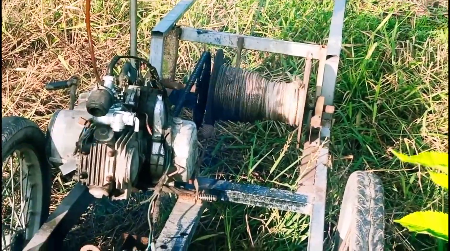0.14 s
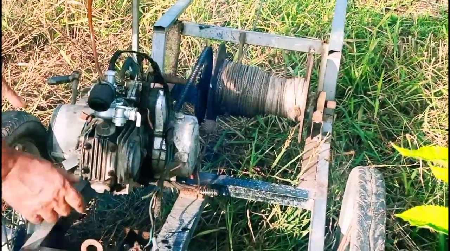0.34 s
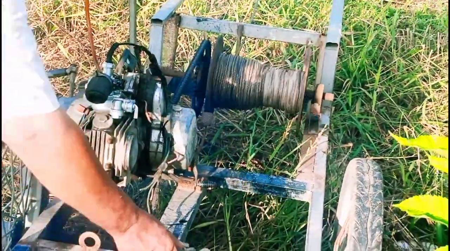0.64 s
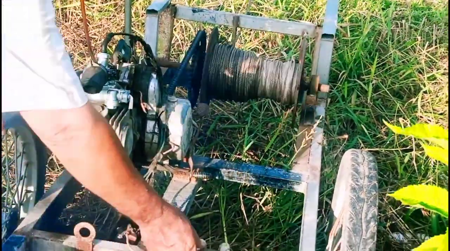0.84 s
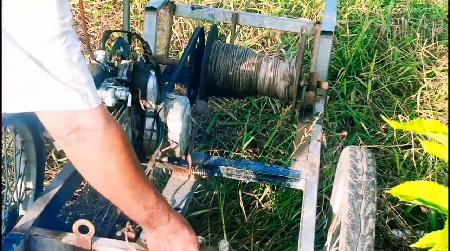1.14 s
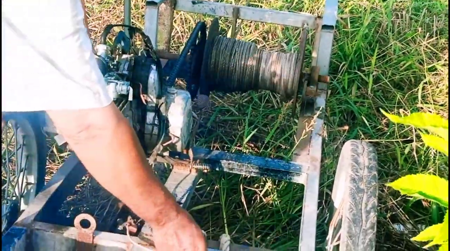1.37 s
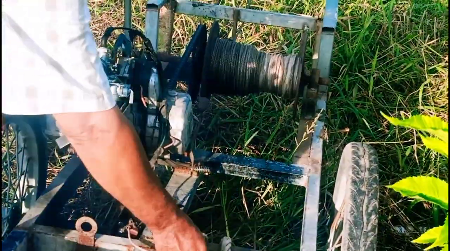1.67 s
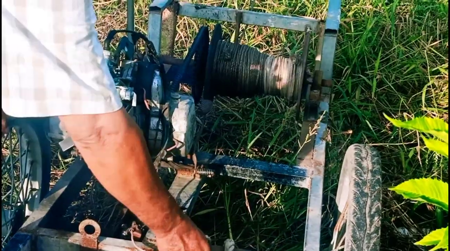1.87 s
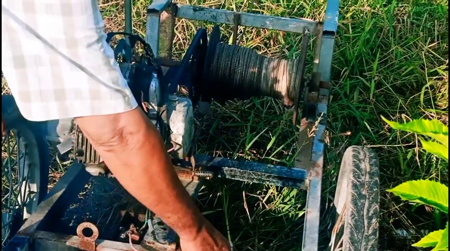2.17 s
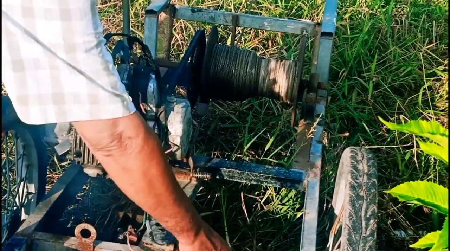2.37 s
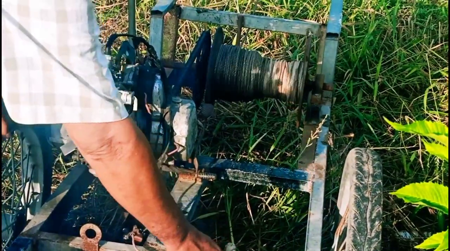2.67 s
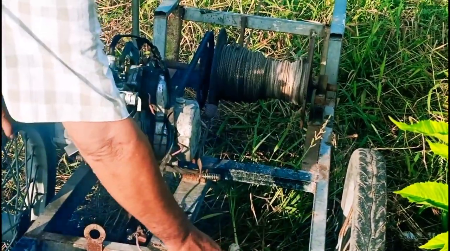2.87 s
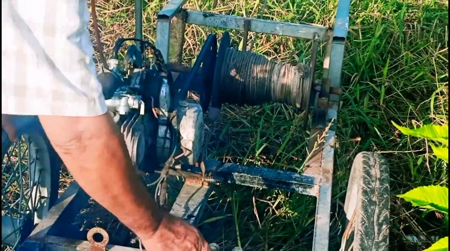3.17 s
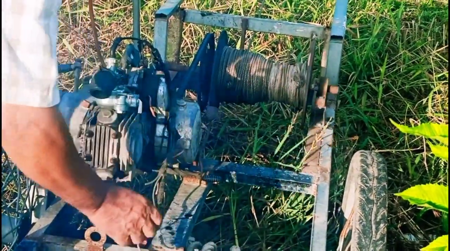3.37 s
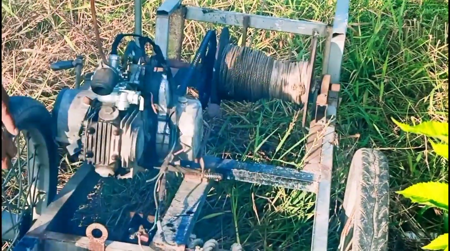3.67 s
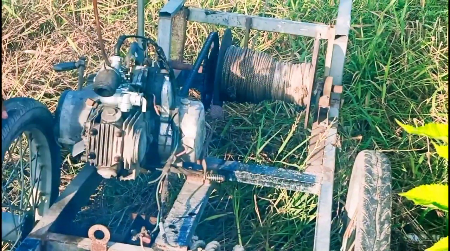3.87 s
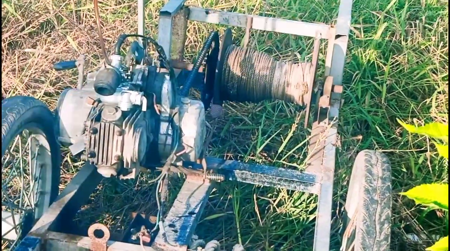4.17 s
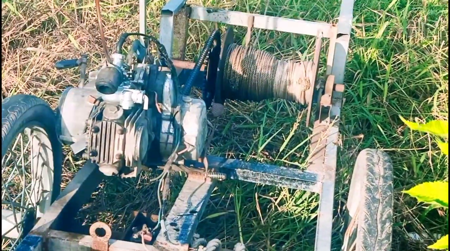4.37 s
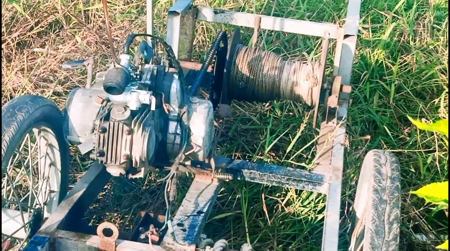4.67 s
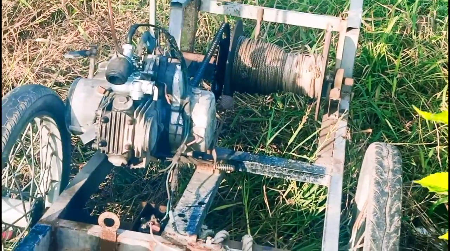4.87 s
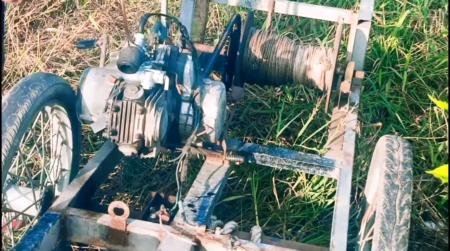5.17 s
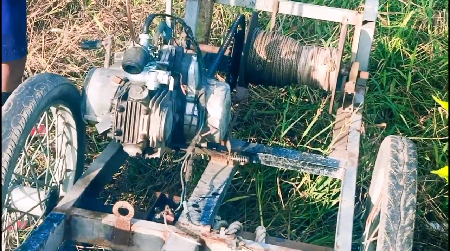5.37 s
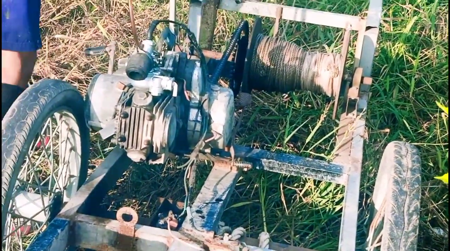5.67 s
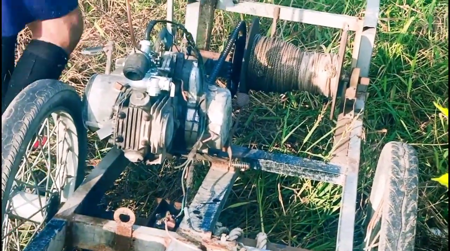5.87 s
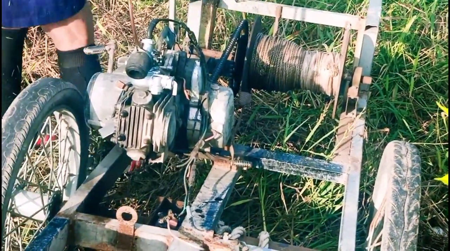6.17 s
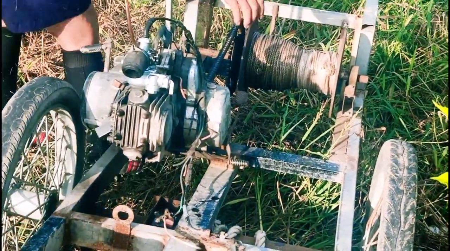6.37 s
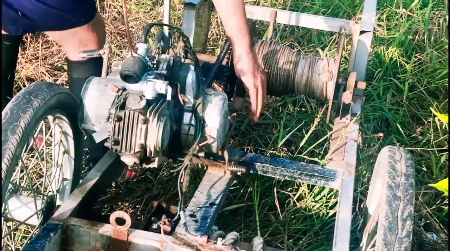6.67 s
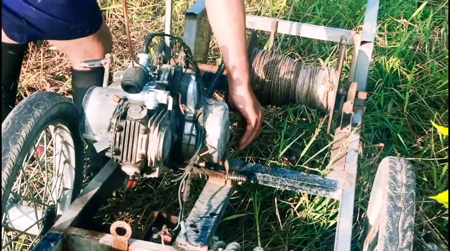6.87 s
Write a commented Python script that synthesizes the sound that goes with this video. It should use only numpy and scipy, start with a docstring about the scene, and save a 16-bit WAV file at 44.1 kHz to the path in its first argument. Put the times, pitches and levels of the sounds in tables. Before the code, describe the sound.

A small single-cylinder engine hoots in a fast even flutter, stumbles down to idle, then alternates soft hoots and sharp chuffs over metallic clatter.

```python
"""Short rising hoots in quick succession: a single-cylinder four-stroke engine on a home-made winch, in a field.
It runs fast for two seconds, stumbles down to idle, where hoot and sharp chuff alternate, and slowly gains strength.
Each hoot is a gliding sine; pulses ring the silencer, and shaped noise and short pings make hiss, whistle and knock.
Chain, gears and tappets clatter throughout as random knocks and noise ticks that ring the casing.
A short faint tail of noise follows the exhaust."""
import sys
import numpy as np
from scipy import signal
from scipy.fft import rfft, irfft
from scipy.io import wavfile

SR = 44100
rng = np.random.default_rng(int(sys.argv[2]) if len(sys.argv) > 2 else 0)


def waveform_to_disk(signal):
    """Save audio, clipped to [-1, 1], as 16-bit WAV at the path in sys.argv[1]."""
    frames = np.transpose(np.atleast_2d(signal))
    scaled = np.clip(frames, -1, 1) * 32767
    samples = np.round(scaled).astype(np.int16)
    wavfile.write(sys.argv[1], SR, samples)


N = 310023  # length in samples
LEAD = 1323  # samples before the zero of a stroke
T = np.arange(-LEAD, 2 * LEAD) / SR  # time around one stroke in seconds
VALVE_LEAD = .398  # the valve opens this share of a stroke before the peak of the hoot
FULL_DB = -13  # chuff strength at full idle, the reference for thump and hiss (dB)

# Engine speed. Each row: time in seconds, exhaust strokes per second.
SPEED = [(0.0, 28.132), (0.32, 28.113), (0.57, 27.368), (0.95, 26.547), (1.52, 26.486), (1.88, 26.676),
         (2.04, 25.348), (2.32, 19.878), (2.63, 16.328), (3.11, 14.07), (3.44, 13.112), (3.81, 12.59),
         (4.43, 12.356), (5.37, 12.393), (6.19, 12.309), (7.03, 12.348)]
# Strength of the strokes at idle, before each layer's trim. Each row: time in seconds, chuff in dB, hoot in dB.
IDLE_STRENGTH = [(2.0, -20.5, -9), (2.7, -24.5, -13.5), (3.2, -23.5, -15.5), (3.7, -21, -15),
                 (4.5, -18.5, -14), (5.2, -14.5, -9.5), (5.7, -13.5, -9), (6.0, -14, -11.5),
                 (7.0, -13.5, -8.5)]
# Clatter of the running gear, before each layer's trim. Each row: time in seconds, level in dB.
GEAR = [(0.0, -34), (0.53, -35), (1.0, -41), (1.9, -41.5), (2.74, -50), (3.44, -48.5), (3.87, -45.5),
        (4.9, -42), (5.3, -39), (7.03, -38)]
# Ringing of casing and cooling fins. Each row: centre in Hz, width in Hz, lift (or dip) in dB.
FINS = [(1010, 75, -2), (1467, 42, 9.5), (1736, 100, 5.5), (1767, 110, 4), (2366, 52, 11.5), (2590, 260, 6),
        (2760, 110, 5.5), (3900, 100, 5), (5940, 300, 6), (15300, 500, -12)]
# Side of the clatter. Each row: frequency in Hz, left minus right in dB.
GEAR_SIDE = [(200, -1), (600, -4.5), (950, 1), (1750, -6.5), (2700, 1), (4200, -4), (6400, -5), (9500, 3.5)]


def amp(db):
    """Decibels to gain."""
    return 10 ** (np.asarray(db) / 20)


def evened(x):
    """Scales to rms 1."""
    return x / np.sqrt(np.mean(x ** 2) + 1e-20)


def at(table, s, axis=1):
    """One column of a curve at time s."""
    rows = np.array(table)
    return np.interp(s, rows[:, 0], rows[:, axis])


def spectrum(points, hz):
    """Joins points on a log-frequency axis."""
    f, value = np.transpose(points)
    return np.interp(np.log(hz + 1), np.log(f + 1), value)


def add(mix, s, sound):
    """Mixes in a sound laid out on T, with its zero at time s."""
    start = round(s * SR) - LEAD
    part = mix[max(start, 0):max(start + len(sound), 0)]
    part += sound[max(-start, 0):][:len(part)]


def bell(x, width):
    """A smooth hump of height 1."""
    return np.exp(-.5 * (x / width) ** 2)


def push(width):
    """A rounded pressure pulse of area 1."""
    return bell(T, width) / bell(T, width).sum()


def ping(hz, rise, fall):
    """A tone that swells and dies within milliseconds."""
    envelope = bell(np.minimum(T, 0), rise) * np.exp(-np.maximum(T, 0) / fall)
    return envelope * np.cos(2 * np.pi * hz * T)


def hiss(rise, fall, linger_db, linger):
    """Envelope of the jet: strongest as the valve cracks open, then lingering through the stroke."""
    after = np.maximum(T, 0)
    decay = np.exp(-after / fall) + amp(linger_db) * np.exp(-after / linger)
    return bell(np.minimum(T, 0), rise) * decay


def wander(rate):
    """Smooth random drift of rms 1, its spectrum fading over 'rate' Hz."""
    fade = bell(np.fft.rfftfreq(N, 1 / SR), rate)
    return evened(irfft(rfft(rng.standard_normal(N)) * fade, N))


def ring(points, modes=(), size=8192):
    """Causal impulse response with the given colour and resonances, peak 1."""
    hz = abs(np.fft.fftfreq(size, 1 / SR))
    resonances = sum(lift / (1 + (2 * (hz - f) / width) ** 2) for f, width, lift in modes)
    db = spectrum(points, hz) + resonances
    minimum_phase = np.exp(np.conj(signal.hilbert(np.log(amp(db)))))
    response = np.fft.ifft(minimum_phase).real[:size // 2]
    return response / abs(response).max()


def through(x, response):
    """Convolution, cut to the scene's length."""
    return signal.oaconvolve(x, response)[:N]


def ports(x, side, lag_ms, apart=0):
    """Left and right: the left hears later by lag_ms; 'apart' reaches the two with opposite sign."""
    hz = np.fft.rfftfreq(N, 1 / SR)
    tilt = amp(spectrum(side, hz) / 2)
    late = np.exp(-1j * np.pi * hz * lag_ms * 1e-3)  # half the lag on each side
    left = irfft(rfft(x + apart) * tilt * late, N)
    right = irfft(rfft(x - apart) / tilt / late, N)
    return np.array([left, right])


def stroke_time(s):
    """The exhaust stroke lasts a quarter of the four-stroke cycle."""
    return 1 / at(SPEED, s) / 4


def above_idle(s):
    """Strokes per second above idle speed."""
    return at(SPEED, s) - SPEED[-1][1]


def shortfall(s):
    """dB (zero or negative) added to the stroke at time s if it is a weak one."""
    # Strokes that fall short of their neighbours. Each row: time in seconds, change in dB.
    weak_strokes = [(0.8, -2.5), (0.95, -1.5), (1.25, -4.5), (1.67, -4.5), (2.37, -5)]
    return sum(db for when, db in weak_strokes if abs(when - s) * at(SPEED, s) < .5)


def strokes():
    """Times of fast strokes, idle hoots and chuffs: hoots at speed, chuffs while slowing, then turns, save stumbles."""
    # The engine stumbles: a chuff among the hoots, or a hoot among the chuffs. Lists times in seconds.
    stumbles = [1.67, 2.05, 2.22]
    start_turn = .756  # share of the four-stroke cycle already run at the start
    idle_from, alternate_from = 1.99, 2.34  # the throttle closes; hoot and chuff begin to alternate (s)
    t = np.arange(N) / SR
    cycles = start_turn + np.cumsum(at(SPEED, t)) / SR
    times = t[1:][np.diff(np.floor(cycles)) > 0]
    fast, settled = times < idle_from, times > alternate_from
    sharp = np.where(settled, np.cumsum(settled) % 2 == 0, ~fast)
    for s in stumbles:
        sharp[np.argmin(abs(times - s))] ^= True
    opens = times - VALVE_LEAD * stroke_time(times)
    return times[fast & ~sharp], times[~fast & ~sharp], opens[sharp]


def field(x, t60=0.076, db=-21, shared=0.79):
    """Frame, ground and plants scatter a short faint tail back, partly alike on both sides."""
    t = np.arange(SR // 2) / SR
    own, common = rng.standard_normal((2, len(t))), rng.standard_normal(len(t))
    fade = amp(-60 * t / t60) * (1 - bell(t, 0.0015))  # a soft start, then the decay
    tail = (shared * common + 0.4 * own) * fade
    return amp(db) * signal.fftconvolve(x, tail / np.linalg.norm(tail[0]), axes=1)[:, :N]


def tappet(chuffs):
    """A light tick from the valve gear, noise ringing the fins, one and a half crank turns before each chuff."""
    ticks = np.zeros(N)
    for s, chance in zip(chuffs, rng.standard_normal(len(chuffs))):
        level = amp(at(GEAR, s) - 2.5 + 2.5 * chance)
        tick = hiss(rise=.0003, fall=0.0038, linger_db=-16.5, linger=.006)
        add(ticks, s - 3.0 * stroke_time(s), level * tick)
    colour = ring([(500, -24), (2500, -9), (6500, 7), (9000, -13.0), (16000, -24)], FINS)  # (Hz, dB)
    sound = through(ticks * rng.standard_normal(N), colour / np.linalg.norm(colour))
    return ports(sound, GEAR_SIDE, lag_ms=0.12)


def gear(slow_strokes):
    """Thousands of small knocks a second from chain and gears ring the casing, swelling around each slow stroke."""
    # Broad relative colour of the clatter. Each row: frequency in Hz, level in dB.
    casing = [(30, -9.5), (110, -8), (230, -0.5), (380, -8), (550, -5.5), (800, 3), (1300, -1.5),
              (2700, -3.5), (3400, -4), (5000, -12), (6600, -14), (8200, -26), (10000, -44.5), (16000, -36)]
    t, strain = np.arange(N) / SR, np.zeros(N)
    for s in slow_strokes:
        add(strain, s - .003, bell(T, 0.013))
    level = amp(at(GEAR, t) + 2.0 + 2.0 * strain + 0.59 * wander(rate=40))
    lumps = amp(2.8 * wander(rate=90))
    colour = ring(casing, FINS)
    sizes = rng.standard_normal((2, N)) * amp(1.43 * rng.standard_normal((2, N)))
    knocks = sizes * (rng.random((2, N)) < 7000 / SR)  # about 7000 a second
    near, spread = (level * evened(through(k * lumps, colour)) for k in knocks)
    return ports(near, GEAR_SIDE, lag_ms=.11, apart=0.71 * spread)


def hoot(s, hz, glide, width, skirt_db, skirt_at, skirt_width):
    """The cylinder rings through the open valve; its pitch climbs as the piston shrinks the volume."""
    travel = T / stroke_time(s)  # in strokes, zero at the peak
    turns = np.cumsum(hz * np.exp(glide * np.clip(travel, -1, .8))) / SR
    swell = bell(travel, width) + amp(skirt_db) * bell(travel - skirt_at, skirt_width)
    return -swell * np.sin(2 * np.pi * (turns - turns[LEAD]))


def add_chuffs(tone, thump, jet, times):
    """Sharp strokes: the valve whistles open on a large pressure pulse, the pipe knocks, a faint hoot follows."""
    whistle_hz, low_whistle_hz = 6150, 4190
    low_whistle_db, low_whistle_from = 18, 5.63  # over the hiss level; joins once the idle is strong (s)
    full_hiss_db, hiss_slope = -29, 1  # before trims, at full strength; dB per dB of strength
    for s, (a, b, c, d) in zip(times, rng.standard_normal((len(times), 4))):
        stroke, thump_db = stroke_time(s), at(IDLE_STRENGTH, s) + shortfall(s)
        haste = above_idle(s)  # above idle speed the knock fades and the hoot takes over, earlier in the stroke
        hiss_db = full_hiss_db + hiss_slope * (thump_db - FULL_DB) + 0.66 * c
        add(thump, s - .0008, -amp(thump_db + 5.0 - 0.24 * haste) * (T == 0))
        add(thump, s + 1.02 * stroke, -amp(thump_db - 8.5) * push(width=0.00072))
        knock = ping(390 * (1 + 0.021 * a), rise=0.00054, fall=0.0075)
        add(tone, s + 0.00338, amp(1.64 * thump_db + 3.0 - 2.6 * haste) * knock)
        rush = hiss(rise=0.0012, fall=0.005, linger_db=-9.0, linger=0.019)
        add(jet, s - .0012, amp(hiss_db + 0.75) * rush)
        whistle = ping(whistle_hz * (1 + .015 * d), rise=0.00084, fall=0.003)
        add(tone, s - .001, amp(hiss_db + 4.5) * whistle)
        if s > low_whistle_from:
            low_whistle = ping(low_whistle_hz * (1 + 0.029 * d), rise=.0012, fall=0.003)
            add(tone, s - .001, amp(hiss_db + low_whistle_db) * low_whistle)
        faint = hoot(s, 717, glide=0.69, width=0.15, skirt_db=-22.0, skirt_at=0.22, skirt_width=0.34)
        hoot_at = s + .7 * np.exp(-haste / 9) * stroke
        add(tone, hoot_at, amp(thump_db - 9 + 0.9 * haste + 3.2 * b) * faint)


def add_idle_hoots(tone, thump, jet, times):
    """Soft strokes: a push as the valve opens, a long hoot, a higher puff of uneven size, a tug as it shuts."""
    hoot_hz, hoot_rise_hz, hoot_scatter = 652.2, 4.7, 0.016  # at idle; per extra stroke a second; share
    puff_hz, puff_rise_hz = 1074, 21  # at idle; per extra stroke a second
    full_thump_db, thump_slope = -20.5, 1.48  # before trims, at full strength; dB per dB of strength
    for s, (a, b, c, d, e, f, g) in zip(times, rng.standard_normal((len(times), 7))):
        stroke, haste = stroke_time(s), above_idle(s)
        db = at(IDLE_STRENGTH, s, axis=2) + shortfall(s) + .9 * e
        hz = (hoot_hz + hoot_rise_hz * haste) * (1 + hoot_scatter * f)
        thump_db = full_thump_db + thump_slope * (at(IDLE_STRENGTH, s) - FULL_DB) + 1.1 * g
        long_hoot = hoot(s, hz, glide=0.68 + 0.18 * a, width=0.14 * amp(0.48 * d),
                         skirt_db=-30.5, skirt_at=0, skirt_width=0.64)
        add(tone, s, amp(db - 0.13) * long_hoot)
        puff = ping((puff_hz + puff_rise_hz * haste) * (1 + 0.079 * c), rise=0.00098, fall=0.0048)
        add(tone, s + 0.31 * stroke, amp(1.38 * db - 10.5 + 3.0 * b) * puff)
        add(thump, s - .5 * stroke, amp(thump_db + 2.5) * push(width=0.000079))
        add(thump, s + 0.65 * stroke, -amp(thump_db + 3.5) * push(width=0.00055))
        rush = hiss(rise=0.0022, fall=0.0058, linger_db=-14.0, linger=0.0092)
        add(jet, s + 0.39 * stroke, amp(db - 37.5) * rush)


def add_fast_strokes(tone, thump, jet, times):
    """Even strokes at speed: a pressure swing with hiss and whistle, and the hoot right after it."""
    # Strength at high speed, before scatter and trims. Each row: time in seconds, hoot in dB, hiss in dB.
    load = [(0.0, -12, -25), (0.35, -12.5, -30), (0.5, -9.5, -26), (0.8, -12, -31), (1.4, -9.5, -28.5),
            (1.7, -12, -31.5), (2.0, -8.5, -29.5)]
    for s, (a, b, c, d, e) in zip(times, rng.standard_normal((len(times), 5))):
        db = at(load, s) + shortfall(s) + 1.1 * a
        opens = s - VALVE_LEAD * stroke_time(s)
        hiss_db = at(load, s, axis=2) + 3.35 * c
        fast_hoot = hoot(s, 690 * (1 + 0.0082 * b), glide=0.59, width=0.2,
                         skirt_db=-12.0 + 2 * d, skirt_at=0.49, skirt_width=0.028)
        add(tone, s, amp(db) * fast_hoot)
        swing = amp(db - 7.5 + 1.45 * (at(SPEED, s) - 30.0))  # harder at higher speed
        for delay, share in [(-.0029, 0.61), (-.0006, -.95), (.0017, 0.98)]:  # push, tug, push
            add(thump, opens + delay, share * swing * (T == 0))
        knock_gain = swing * amp(-6.0 + 2 * (at(SPEED, s) - 25))
        add(tone, opens + 0.0023, -knock_gain * ping(414, rise=0.0024, fall=0.0042))  # the pipe knocks
        rush = hiss(rise=0.0018, fall=0.0017, linger_db=-12.5, linger=0.013)
        add(jet, opens + 0.00036, amp(hiss_db + 2.0) * rush)
        whistle = ping(6200 * (1 + 0.011 * e), rise=0.00022, fall=0.0031)
        add(tone, opens + .0006, amp(hiss_db + 2.5 + 2 * d) * whistle)


def exhaust(fast, hoots, chuffs):
    """Tones sound directly, thumps ring the silencer, and bursts of jet noise rush past the valve."""
    # Pass bands and notches of the silencer, relative. Each row: frequency in Hz, level in dB.
    silencer = [(25, -30), (60, -11), (95, 1.5), (140, 3.5), (255, 1.5), (330, -15), (395, 0), (450, 6),
                (530, -10.5), (610, -8.5), (800, -11.5), (1050, -46.5), (2500, -42), (8000, -66)]
    # Relative colour of gas rushing past the valve. Each row: frequency in Hz, level in dB.
    jet_colour = [(300, -43), (900, 7), (1700, 0), (2600, 8), (3400, 1.5), (4200, 6), (5500, 1),
                  (6250, 2.5), (6900, -7), (8200, -16), (10000, -26), (16000, -23.5)]
    # Side of the exhaust. Each row: frequency in Hz, left minus right in dB.
    exhaust_side = [(100, -.6), (300, 0), (420, 4), (520, -9.5), (650, -7), (800, 0), (1200, -1.5),
                    (2700, 0.5), (4200, -2.5), (6400, -7.5), (9500, 6), (15000, 0.5)]
    tone, thump, jet = np.zeros((3, N))
    add_fast_strokes(tone, thump, jet, fast)
    add_idle_hoots(tone, thump, jet, hoots)
    add_chuffs(tone, thump, jet, chuffs)
    colour = ring(jet_colour)
    colour = colour / np.linalg.norm(colour)
    rush, spread = (through(jet * rng.standard_normal(N), colour) for _ in range(2))
    middle = tone + through(thump, ring(silencer)) + rush
    return ports(middle, exhaust_side, lag_ms=0.11, apart=0.54 * spread)


def scene():
    """The engine in the open air."""
    fast, hoots, chuffs = strokes()
    pipe = exhaust(fast, hoots, chuffs)
    return field(pipe) + tappet(chuffs) + gear(np.r_[hoots, chuffs]) + pipe


def record(dry):
    """A steep low-pass takes off the very top of the treble."""
    edge_hz = 16100
    low_pass = signal.firwin(511, edge_hz, window=("kaiser", 9), fs=SR)
    return signal.oaconvolve(dry, low_pass[None], "same")


dry = scene()
out = record(dry)
waveform_to_disk(out)
```